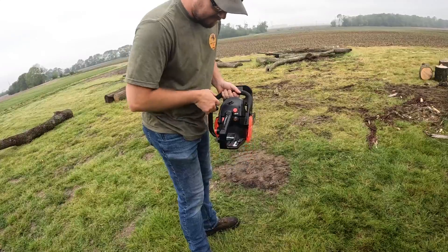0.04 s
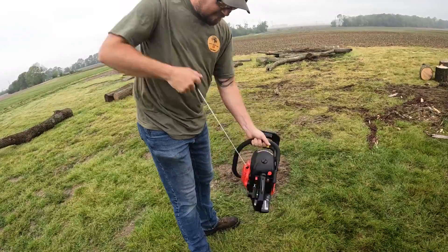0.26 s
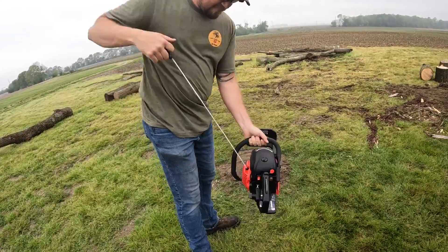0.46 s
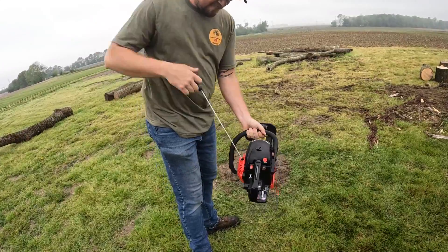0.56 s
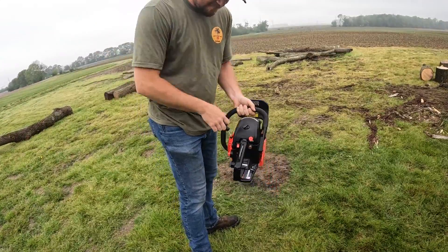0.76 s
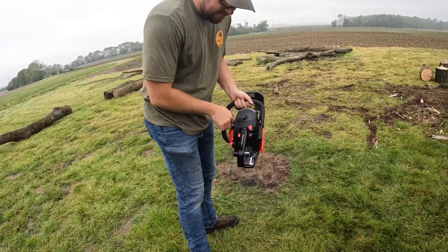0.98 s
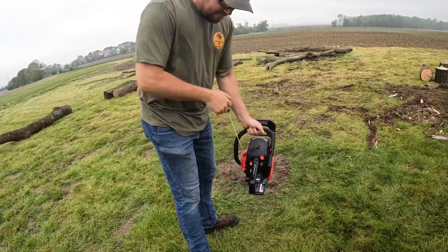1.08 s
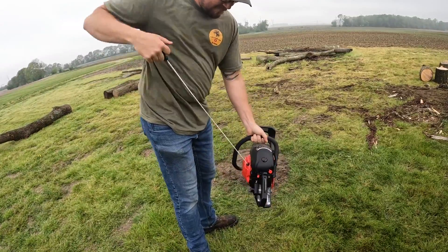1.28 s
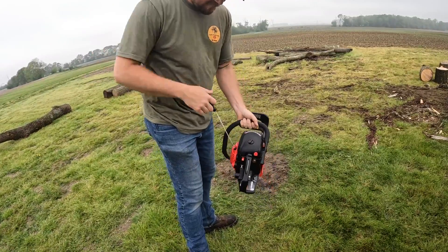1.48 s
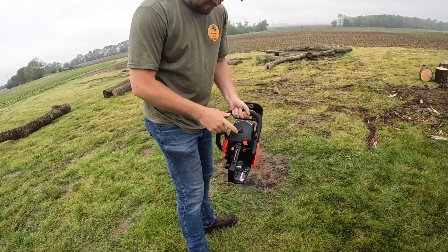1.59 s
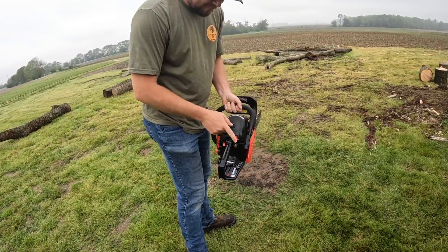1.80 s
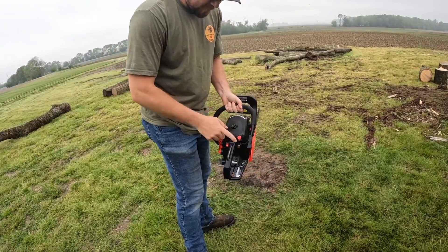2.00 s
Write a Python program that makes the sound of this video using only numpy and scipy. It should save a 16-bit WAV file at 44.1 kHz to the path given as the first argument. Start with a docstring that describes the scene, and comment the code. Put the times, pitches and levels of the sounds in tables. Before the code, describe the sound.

Close up in an open field, a chainsaw's starter cord is pulled twice; each pull clicks, rasps and puffs a few low engine strokes, then the cord rewinds with a metallic rattle and a knock.

```python
"""In an open field, a two-stroke chainsaw is cranked twice by its pull cord and does not fire.
Each pull: pawls catch, the cord rasps out, the slowing piston puffs, the cord zips at full stretch;
then the reel rewinds with chinking steel and the handle slaps home. Puffs are shaped pulses; rasps, knocks
and scrapes are gritty noise through resonant bodies; rings are decaying sines. Noise makes the open air and
a far low drone. The close microphone overloads on the peaks."""
import sys
import numpy as np
from scipy import signal
from scipy.fft import rfft, irfft, next_fast_len
from scipy.io import wavfile
from scipy.ndimage import uniform_filter1d, map_coordinates

SR = 44100
rng = np.random.default_rng(int(sys.argv[2]) if len(sys.argv) > 2 else 0)


def pcm_store(signal):
    """Save signal as 16-bit PCM."""
    levels = np.round(np.clip(np.atleast_2d(signal), -1, 1) * 32767)
    wavfile.write(sys.argv[1], SR, levels.astype(np.int16).T)


N = 90404

# the crankshaft in each pull, from its first exhaust puff: [t/s, speed/turns per s, puff level/dB]
CRANK_PULLS = [
    [(.2728, 33.2, -2), (.305, 45.6, -5), (.417, 30.5, -13.5), (.455, 19, -13.5), (.55, 19.8, -23.5)],
    [(1.119, 56.8, -18), (1.1405, 38.4, -5), (1.154, 36.5, -5), (1.19, 37, -10), (1.24, 25.7, -11),
     (1.287, 19.5, -16.5), (1.38, 13, -26)],
]
# resonances of the steel parts: [f/Hz, width/Hz, relative level/dB]
STEEL_MODES = [(4240, 37, -5), (4940, 53, 2), (5373, 27, 5.5), (5550, 65, -3), (6210, 69.3, 7.5),
               (7250, 60, 5.5), (7910, 49, 3), (8250, 67, -10.5), (10870, 79, 1), (11700, 96, 1.5),
               (12700, 90, -1)]
# resonances of the plastic housing: [f/Hz, width/Hz, relative level/dB]
HOUSING_MODES = [(450, 52, -0.5), (810, 98, 0), (1135, 230, -3), (1250, 30, -8.5), (1730, 190, -7),
                 (2865, 210, -2.5), (3184, 32, 0)]
# broad colour of knocks and slaps: [f/Hz, relative level/dB]
KNOCK_TONE = [(100, -59.5), (280, -11.5), (460, 4.5), (1100, 3), (1700, -1), (2300, -4), (3100, -7),
              (5000, -8), (8000, -14), (10000, -20.5), (13500, -23.5), (16000, -34)]
# the far drone as it comes and goes: [t/s, level/dB]
DRONE_FADER = [(0, -37.5), (.25, -32.5), (.55, -40), (1.1, -41), (1.6, -47), (1.8, -47.5), (2.05, -46)]


def amp(db):
    """Linear gain of a level in dB."""
    return 10 ** (np.asarray(db) / 20)


def unit(x):
    """x scaled to rms 1."""
    return x / np.sqrt(np.mean(x ** 2) + 1e-20)


def clock():
    """Time of every sample in seconds."""
    return np.arange(N) / SR


def filtered(x, response):
    """x times a complex response of frequency."""
    m = next_fast_len(N + SR // 2)
    hz = np.fft.rfftfreq(m, 1 / SR)
    return irfft(rfft(x, m) * response(hz), m)[..., :N]


def colour(points, hz):
    """Gain of (Hz, dB) points joined on a log frequency axis."""
    f, db = np.transpose(points)
    return amp(np.interp(np.log(hz + 1), np.log(f + 1), db))


def resonances(modes, hz):
    """Complex response of a set of damped resonances, summed."""
    return sum(amp(db) * 1j * hz * width / (centre * centre - hz * hz + 1j * hz * width)
               for centre, width, db in modes)


def body(x, points, modes, modes_db, tilt_db=0):
    """x through a causal body of unit power gain: a broad colour with resonances on top."""
    def response(hz):
        gain = colour(points, hz) * (1 + amp(modes_db) * abs(resonances(modes, hz)))
        octaves = np.log2(np.clip(hz, 400, 6000) / 1000)
        gain = gain * amp(tilt_db * octaves)
        # folding the cepstrum gives minimum phase: no sound ahead of the blow
        cepstrum = irfft(np.log(unit(gain) + 1e-6), 2 * len(hz) - 2)
        cepstrum[1:len(hz) - 1] *= 2
        cepstrum[len(hz):] = 0
        return np.exp(rfft(cepstrum))
    return filtered(x, response)


def grit(rate, share):
    """Noise of about rms 1, a share of its power in sharp contacts at a rate per second."""
    hits = rng.random(N) < rate / SR
    ticks = hits * rng.choice([-1, 1], N) * rng.uniform(.4, 1.6, N)
    return np.sqrt(share) * unit(ticks) + np.sqrt(1 - share) * rng.standard_normal(N)


def level(s, db):
    """Gain along a dB curve, fading to -90 dB outside it."""
    times = np.r_[s[0] - .004, s, s[-1] + .02]
    return amp(np.interp(clock(), times, np.r_[-90, db, -90]))


def turns(s, speed):
    """Turns made since the first point of a speed curve."""
    made = np.cumsum(np.interp(clock(), s, speed)) / SR
    return made - np.interp(s[0], clock(), made)


def burst(s, hold, t60, attack):
    """Envelope of a contact: linear attack, hold and exponential release."""
    t = clock() - s
    return np.clip(t / attack, 0, 1) * amp(-60 * np.maximum(t - hold, 0) / t60)


def stressed(x, ring_hz, q, boost_db):
    """Stress one resonance of a contact, keeping the power the same."""
    y = filtered(x, lambda hz: 0.5 + resonances([(ring_hz, ring_hz / q, boost_db)], hz))
    return unit(y) * np.sqrt(np.mean(x ** 2))


def struck(modes, s, hold, stress_hz, tilt_db=0):
    """The ring of a struck part: decaying sines, those near stress_hz standing out."""
    stress_db = 7  # extra level of a mode right at the point of contact
    out = np.zeros(N)
    for hz, db, t60 in modes:
        nearness = np.exp(-(20 * np.log(hz / stress_hz)) ** 2)
        mode_db = db + tilt_db * np.log2(hz / 1000) + stress_db * nearness
        tone = np.sin(2 * np.pi * (hz * clock() + rng.random()))
        out += amp(mode_db) * burst(s, hold, t60, attack=0.0016) * tone
    return out


def shifting(x, depth_db):
    """The points of contact wander, so different resonances stand out from moment to moment."""
    z = signal.stft(x, nperseg=512)[2]
    patches = rng.standard_normal(z.shape)
    for axis in (0, 1):
        patches = uniform_filter1d(patches, size=4, axis=axis)
    gain = unit(amp(depth_db * unit(patches)))
    return signal.istft(z * gain, nperseg=512)[1][:N]


def piston():
    """Each turn pushes one puff out of the exhaust and gulps once at the intake."""
    exhaust_hz, intake_hz = 236, 465  # before scatter; the puff also deepens with a slower stroke
    intake_turn, intake_db = .43, -6.5  # the gulp's delay in turns, its level relative to the puff curve
    pitch_follows = 0.15  # exponent of speed in the puff's pitch
    puff_scatter, gulp_scatter = .07, .075  # spread of pitch, as a share
    muffler_hz = 138  # the muffler radiates little below this
    out, t = np.zeros(N), clock()
    for rows in CRANK_PULLS:
        s, speed, db = np.transpose(rows)
        angle = turns(s, speed)
        for k in range(int(np.interp(s[-1], t, angle)) + 1):
            puff, gulp = np.interp([k, k + intake_turn], angle, t)
            stroke = np.interp(puff, s, speed) / speed.max()
            puff_hz = exhaust_hz * (1 + rng.normal(0, puff_scatter)) * stroke ** pitch_follows
            u = 2 * np.pi * puff_hz * (t - puff)
            out -= amp(np.interp(puff, s, db)) * u * np.exp((1 - u * u) / 2)
            v = intake_hz * (1 + rng.normal(0, gulp_scatter)) * (t - gulp)
            window = np.exp(-(v / np.where(v < 0, .6, 1.4)) ** 2)  # swells faster than it fades
            out += amp(np.interp(gulp, s, db) + intake_db) * np.cos(2 * np.pi * v) * window
    return filtered(out, lambda hz: hz ** 3 / np.sqrt(hz ** 6 + muffler_hz ** 6))


def cord():
    """The cord rasps through its guide and spins the flywheel; the rasp surges twice a turn."""
    # cord and flywheel rasp in each pull, before the surge: [t/s, level/dB]
    rasp_pulls = [
        [(.185, -28), (.205, -22), (.24, -17), (.265, -15), (.3, -17.5), (.34, -27), (.41, -29.5), (.46, -39.5),
         (.57, -36.5)],
        [(1.062, -20), (1.075, -21.5), (1.108, -22.5), (1.135, -18.5), (1.19, -28), (1.225, -22.5), (1.29, -42),
         (1.36, -30.5), (1.41, -40)],
    ]
    # broad colour of the rasp: [f/Hz, relative level/dB]
    rasp_tone = [(100, -44), (250, -7.5), (450, -2), (780, -2.5), (1200, -9), (1700, -6.5), (3200, -15),
                 (5200, -12.5), (8000, -22.5), (10000, -24.5), (14000, -34), (16000, -47)]
    drive = np.zeros(N)
    for rasp, crank in zip(rasp_pulls, CRANK_PULLS):
        s, speed, _ = np.transpose(crank)
        surge_db = 0.61 * np.cos(4 * np.pi * turns(s, speed) + 0.16)
        drive += level(*np.transpose(rasp)) * amp(surge_db)
    rasping = body(drive * grit(rate=420, share=0.72), rasp_tone, HOUSING_MODES, modes_db=4)
    return shifting(rasping, depth_db=1.5)


def whirr():
    """The braid running through its guide: a rough tone that rises as the first pull gathers speed."""
    # the whirr's glide: [t/s, f/Hz, level/dB]
    glide = [(.2, 2700, -38), (0.209, 4000, -33), (.223, 5250, -31), (.236, 5400, -40)]
    s, hz, db = np.transpose(glide)
    fuzz = unit(filtered(rng.standard_normal(N), lambda f: 1 / (1 + (f / 500) ** 4)))
    return np.sqrt(2) * level(s, db) * fuzz * np.sin(2 * np.pi * turns(s, hz))


def zips():
    """Short, bright bursts of fast slipping of cord and pawls, each stressing one steel resonance."""
    # the zips: [t/s, level/dB, hold/s, t60/s, strongest ring f/Hz]
    zip_events = [(0.3114, -2, 0.0049, 0.045, 4680), (0.4755, -17, 0.0054, 0.075, 5690),
                  (1.06, -14.5, 0.012, 0.074, 5310), (1.165, -1, 0.0052, 0.048, 7640),
                  (1.348, -26, 0.011, .04, 8060), (1.359, -26, 0.011, 0.11, 6170)]
    # broad colour of a zip: [f/Hz, relative level/dB]
    zip_tone = [(1500, -39), (2500, -19), (3400, -6), (5200, -1), (6600, -3), (7900, 0.5), (9500, -13),
                (13500, -15), (16000, -23.5)]
    out = np.zeros(N)
    for s, db, hold, t60, ring_hz in zip_events:
        drive = amp(db) * burst(s, hold, t60, attack=0.0035) * grit(rate=1600, share=0.47)
        slip = body(drive, zip_tone, STEEL_MODES, modes_db=-1)
        out += stressed(slip, ring_hz, q=59, boost_db=2.5)
    return out


def slaps():
    """Hard blows on the starter cover, as pawls bite or the handle slaps home: chatter and ring."""
    # the blows: [t/s, chatter level/dB, hold/s, t60/s, treble tilt/dB per octave, ring level/dB,
    # strongest ring f/Hz]
    blows = [(0.1992, -23.5, .004, .05, -3, -21.5, 727), (0.2448, -11.5, 0.0048, 0.036, -2, -13.5, 800),
             (0.85, -17.5, .003, 0.051, 0, -14.5, 800), (1.6257, -6, 0.003, 0.028, 1, -23, 700),
             (1.6416, -9.5, 0.0042, 0.029, 4, -15, 2830), (1.646, -13, 0.0035, 0.055, 1.5, -10, 1100)]
    # what handle and cover ring with: [f/Hz, relative level/dB, t60/s]
    handle_modes = [(460.8, 1, .042), (699.8, -2.5, 0.032), (800, -3, .043), (913, -5, 0.039),
                    (1100, -4.5, 0.042), (1260, -3.5, 0.042), (1710, -10, 0.023), (2826, -9.5, 0.015),
                    (3220, -8, 0.014), (3650, -20.5, 0.024)]
    out = np.zeros(N)
    for s, db, hold, t60, tilt, ring_db, ring_hz in blows:
        drive = amp(db) * burst(s, hold, t60, attack=.0006) * grit(rate=3000, share=.6)
        out += body(drive, KNOCK_TONE, HOUSING_MODES, modes_db=-5.5, tilt_db=tilt)
        out += amp(ring_db) * struck(handle_modes, s, 0.0043, ring_hz, tilt)
    return out


def knocks():
    """Each knock is a brief chatter of contacts on the housing, with one resonance ringing out."""
    # knocks of pawls and housing: [t/s, level before the trims below/dB, hold/s, t60 of the chatter/s,
    # treble tilt/dB per octave, strongest ring f/Hz]
    knock_events = [(0.147, -29, 0.0014, 0.13, 0, 685), (0.1862, -18.5, 0.0018, 0.02, 5.5, 3580),
                    (0.212, -22.5, 0.015, 0.05, -2, 760), (0.2441, -13.5, 0.0018, 0.017, 12.5, 5200),
                    (0.251, -27, .002, .015, 2, 3400), (0.261, -10, 0.0027, 0.021, 1, 3840),
                    (0.266, -13, 0.0047, 0.063, -1, 1210), (0.306, -25, 0.0018, 0.018, -11, 4600),
                    (0.421, -29.5, 0.013, 0.036, 2.5, 2160), (0.469, -24.5, 0.023, 0.019, 2.5, 2960),
                    (0.529, -23, 0.01, 0.071, -0.5, 1093), (0.589, -27, 0.0048, 0.07, 0, 1164),
                    (0.678, -22, 0.0066, 0.014, 0, 2040), (0.708, -22.5, 0.0017, 0.028, 6, 2710),
                    (1.025, -23.5, 0.0018, 0.093, 1.5, 1190), (1.066, -1.5, 0.0017, 0.016, 3, 3330),
                    (1.075, -14.5, 0.0047, 0.084, -0.5, 720), (1.112, -14.5, 0.0042, 0.036, 0, 730),
                    (1.132, -16, 0.009, 0.018, -1, 483), (1.211, -20.5, 0.014, 0.044, 1.5, 833),
                    (1.25, -24, 0.0054, 0.091, 8.5, 2700), (1.305, -23.5, 0.011, .04, -0.5, 1270),
                    (1.343, -23.5, 0.029, 0.031, 1, 1750), (1.431, -25.5, 0.013, 0.091, 0.5, 1357),
                    (1.454, -23, 0.0086, 0.059, 0, 720), (1.523, -21, 0.005, 0.045, 1, 1210),
                    (1.546, -23, 0.0043, 0.027, 4.5, 2700), (1.983, -36.5, 0.0033, 0.031, 6, 3760)]
    chatter_db, ring_db = -1.5, -4  # trims of the two parts
    out = np.zeros(N)
    for s, db, hold, t60, tilt, ring_hz in knock_events:
        drive = amp(db) * burst(s, hold, t60, attack=0.0006) * grit(rate=2200, share=0.67)
        chatter = body(drive, KNOCK_TONE, HOUSING_MODES, modes_db=5.0, tilt_db=tilt)
        tone = np.sin(2 * np.pi * ring_hz * (clock() - s))
        ring = amp(db + ring_db) * burst(s, hold / 2, 0.87 * t60, attack=0.0011) * tone
        out += amp(chatter_db) * chatter + ring
    return out


def reel():
    """The spring winds the cord back, scraping steel and shaking the housing once a turn."""
    # each rewind, before its surge: [t/s, speed/turns per s, scraping steel level/dB,
    # rattling housing level/dB]
    rewinds = [
        [(.572, 32, -32, -35), (.585, 67, -27, -25), (.605, 81, -27.5, -25), (.645, 70, -27.5, -30),
         (.7, 59.6, -35, -36), (.765, 60, -41, -36.5), (.79, 33, -31, -31.5), (.822, 32, -33.5, -33.5),
         (.85, 69, -25, -26.5)],
        [(1.425, 39.4, -46.5, -28), (1.468, 38.4, -42.5, -35), (1.482, 66.6, -30.5, -32),
         (1.52, 54, -24, -28.5), (1.55, 49.7, -21, -30.5), (1.575, 55, -24.5, -30.5), (1.625, 33, -26.5, -25.5)],
    ]
    # the steel scrape of each rewind: [f/Hz, relative level/dB]
    scrape_tones = [
        [(1500, -34.5), (3000, -20.5), (4200, 2.5), (5400, 4), (6800, -14), (8200, -2.5), (9500, -5),
         (13000, -13.5), (16000, -22.5)],
        [(1500, -45.5), (2900, 4), (4200, -2), (5400, -1), (6500, -12.5), (8000, -3), (9500, -1),
         (13000, -12.5), (16000, -23.5)],
    ]
    # broad colour of the rattling housing: [f/Hz, relative level/dB]
    rattle_tone = [(150, -41.5), (400, -4.5), (700, -2.5), (1150, -3.5), (1800, -3), (2400, -5.5),
                   (3100, -9.5), (4500, -15.5), (9000, -39)]
    # how far each rewind surges up and down once a turn: [swing/dB]
    swings = [3.9, 4.5]
    out = np.zeros(N)
    for rows, scrape_tone, swing_db in zip(rewinds, scrape_tones, swings):
        s, speed, steel_db, housing_db = np.transpose(rows)
        surge = amp(swing_db * np.cos(2 * np.pi * (turns(s, speed) - .2)))
        scrape = level(s, steel_db) * surge * grit(rate=810, share=0.56)
        rattle = level(s, housing_db) * surge * grit(rate=400, share=0.72)
        out += body(scrape, scrape_tone, STEEL_MODES, modes_db=14)
        out += body(rattle, rattle_tone, HOUSING_MODES, modes_db=1.0)
    return shifting(out, depth_db=4)


def chinks():
    """Loose steel chatters as the cord rewinds and rings on in a beating cluster of modes."""
    # the chinks: [t/s, chatter level/dB, hold/s, t60/s, ring level/dB, strongest ring f/Hz]
    chink_events = [(0.5753, -15, 0.0042, .025, -32, 6100), (0.585, -31.5, 0.0033, 0.037, -34, 4900),
                    (.706, -24, 0.0025, 0.031, -42.5, 5970), (0.774, -21, 0.013, .055, -42, 5500),
                    (0.826, -21, 0.0077, .06, -33, 8020)]
    # broad colour of the chatter: [f/Hz, relative level/dB]
    chink_tone = [(1500, -37.5), (3000, -8.5), (4200, -7.5), (5400, -1), (6800, -11), (8200, -8),
                  (9500, -8), (13000, -15), (16000, -24.5)]
    # the long ring of the struck steel: [f/Hz, relative level/dB, t60/s]
    ring_modes = [(5200, 1.5, 0.32), (5298, 1, .47), (5392, 6, 0.62), (5460, 1, 0.27), (6240, -2.5, .15),
                  (7900, -17, .28), (11120, -15.5, 0.23), (13120, -15.5, 0.28)]
    out = np.zeros(N)
    for s, db, hold, t60, ring_db, ring_hz in chink_events:
        drive = amp(db) * burst(s, hold, t60, attack=0.0027) * grit(rate=2300, share=0.32)
        chatter = body(drive, chink_tone, STEEL_MODES, modes_db=6)
        out += stressed(chatter, ring_hz, q=34, boost_db=6.5)
        out += amp(ring_db) * struck(ring_modes, s, 0, ring_hz)
    return out


def field():
    """Open air and a far, low drone: coloured noise, with a steady treble hiss."""
    # colour of the air: [f/Hz, relative level/dB]
    air_tone = [(25, -1.5), (90, 5.5), (180, -9.5), (320, -5), (520, -21), (1200, -14), (2000, -18.5),
                (4500, -28.5), (8000, -40), (16000, -68)]
    # the air as it swells and sinks: [t/s, level/dB]
    air_fader = [(0, -37), (.15, -37), (.95, -40.5), (1.65, -38), (1.819, -51.5), (1.95, -44),
                 (2.05, -42.5)]
    # colour of the hiss: [f/Hz, relative level/dB]
    hiss_tone = [(1000, -1), (2500, 1), (5500, 0), (8000, -15.5), (16000, -40)]
    # resonances of the drone: [f/Hz, width/Hz, relative level/dB]
    drone_modes = [(81, 13, 9.5), (105.5, 6.5, 2), (145.3, 10.5, -9), (206, 16, -7)]

    def noise(response):
        return unit(filtered(rng.standard_normal(N), response))
    air = noise(lambda hz: colour(air_tone, hz) * hz / np.hypot(hz, 170))
    hiss = noise(lambda hz: colour(hiss_tone, hz))
    drone = noise(lambda hz: resonances(drone_modes, hz) * (hz / np.hypot(hz, 55)) ** 4)
    far = drone * level(*np.transpose(DRONE_FADER))
    return air * level(*np.transpose(air_fader)) + amp(-55) * hiss + far


def hum():
    """A faint low tone within the far drone, its pitch and level wavering at random."""
    centre_hz, drift_hz = 71.8, 2.5
    hum_db, swell_db = -8, 0.87  # level relative to the drone, and its wavering
    drift, swell = [map_coordinates(rng.standard_normal(40), [clock() * 12]) for _ in range(2)]
    gain = level(*np.transpose(DRONE_FADER)) * amp(hum_db + swell_db * swell)
    cycles = np.cumsum(centre_hz + drift_hz * drift) / SR
    return np.sqrt(2) * gain * np.sin(2 * np.pi * cycles)


def scene():
    """Everything is heard in the middle, with a faint, diffuse difference between the two channels."""
    engine = piston()
    starter = cord() + whirr() + zips() + slaps() + knocks() + reel() + chinks()
    mono = engine + starter + field() + hum()
    scatter = rng.standard_normal(SR // 100)  # 10 ms of even noise
    side = amp(-53) * signal.fftconvolve(mono, scatter / np.linalg.norm(scatter))[:N]
    return np.array([mono + side, mono - side])


def record(dry):
    """The overload rounds off the peaks unevenly; nothing is kept above the band limit."""
    lopsided = 0.069  # the positive peaks give way this share sooner
    band_limit_hz = 16100
    top = 1 - lopsided * (dry > 0)
    clipped = dry / (1 + abs(dry / top) ** 6) ** (1 / 6)
    return filtered(clipped, lambda hz: hz < band_limit_hz)


dry = scene()
out = record(dry)
pcm_store(out)
```